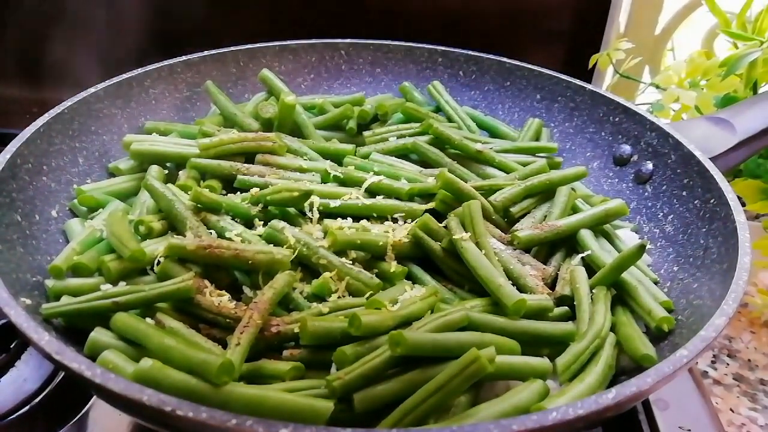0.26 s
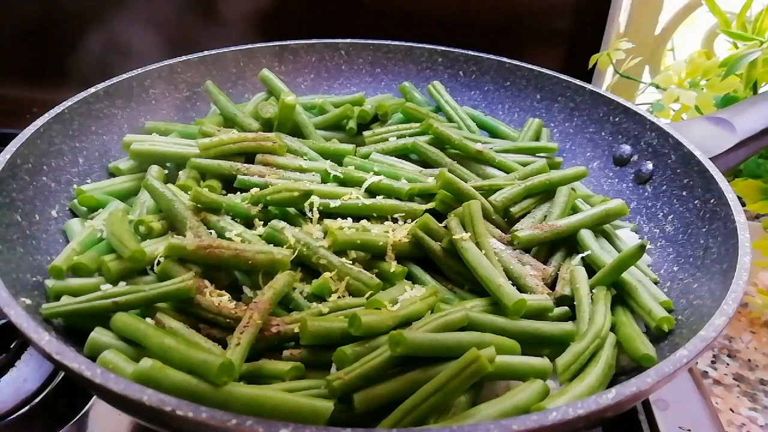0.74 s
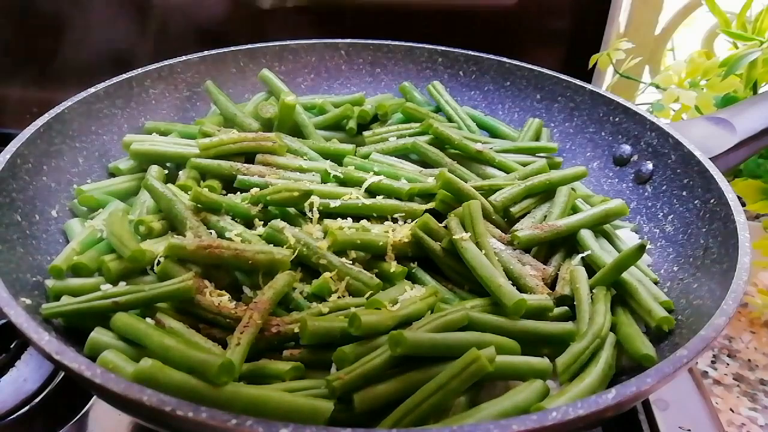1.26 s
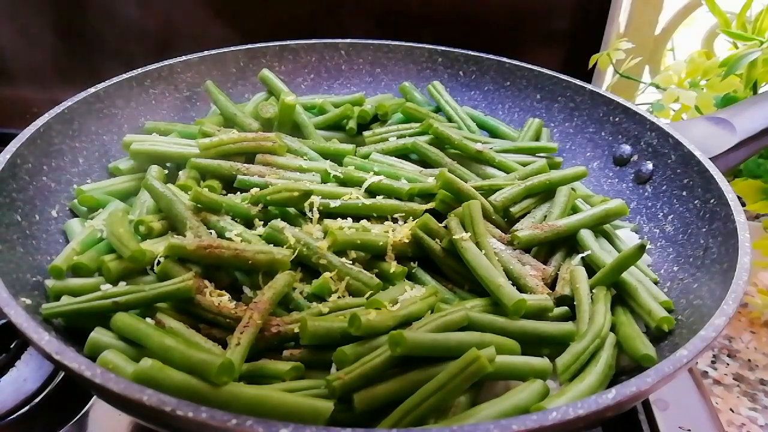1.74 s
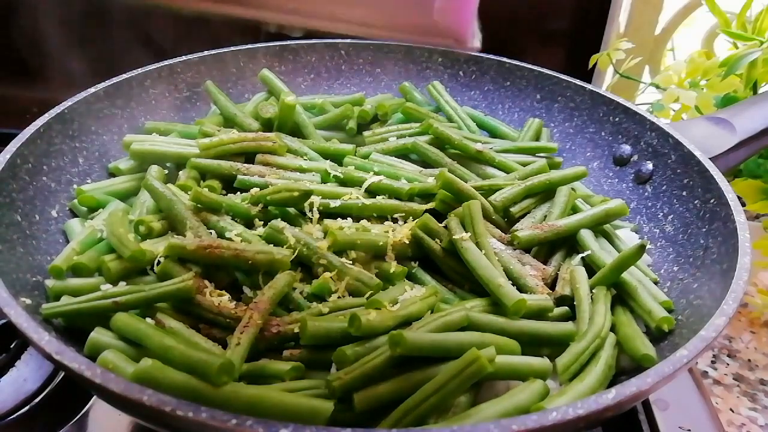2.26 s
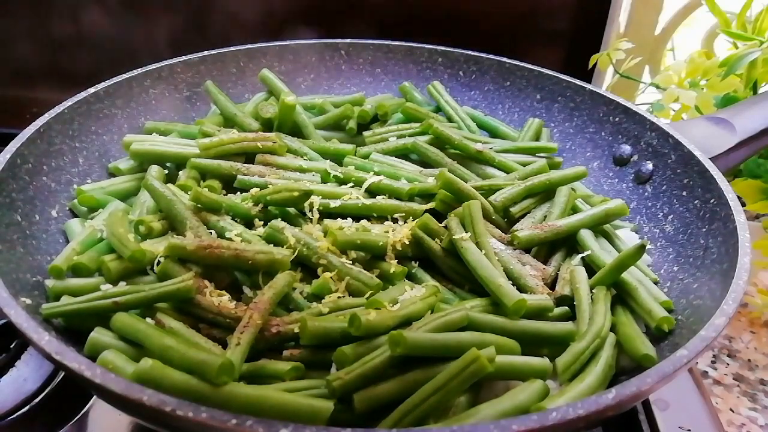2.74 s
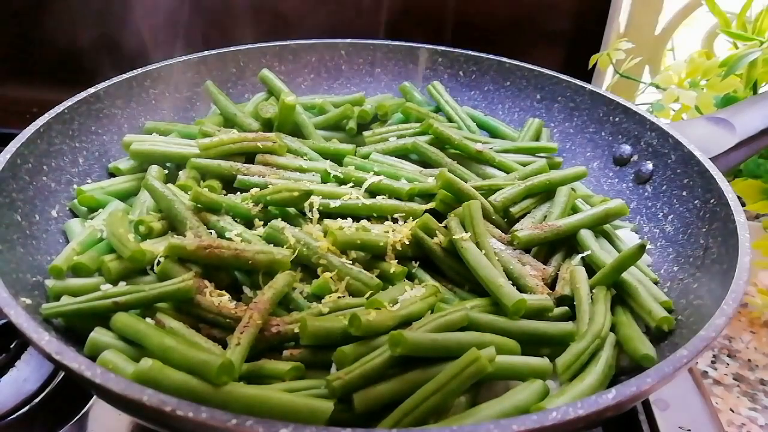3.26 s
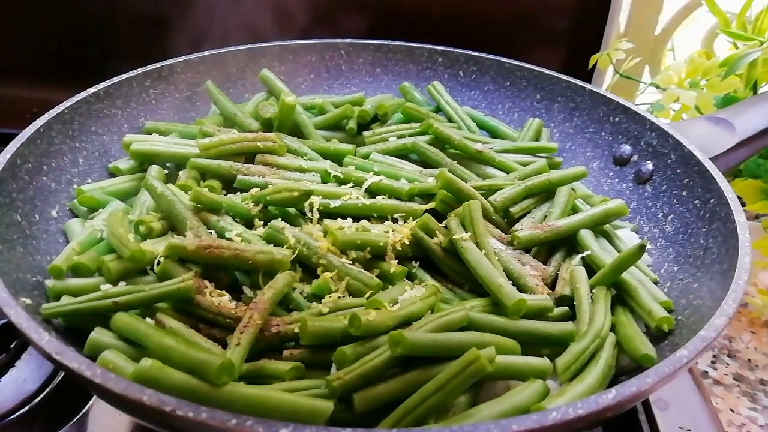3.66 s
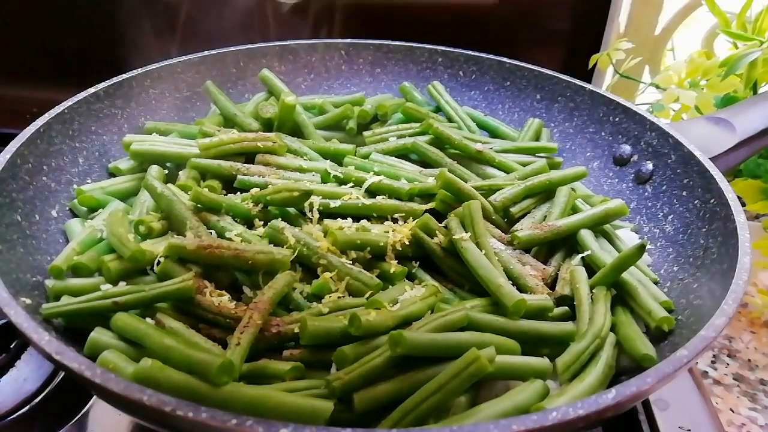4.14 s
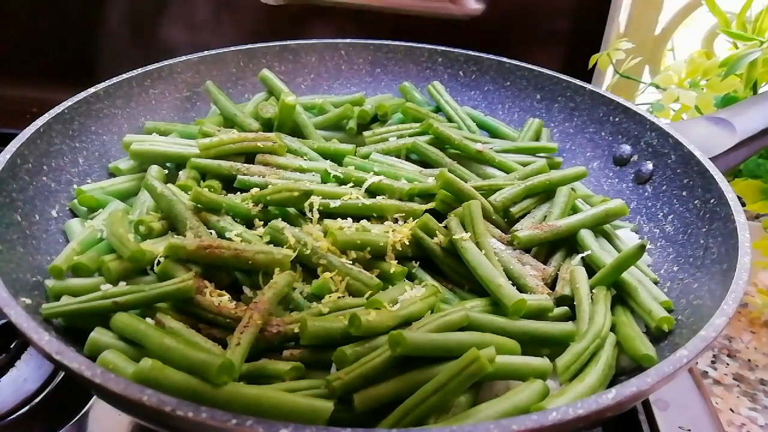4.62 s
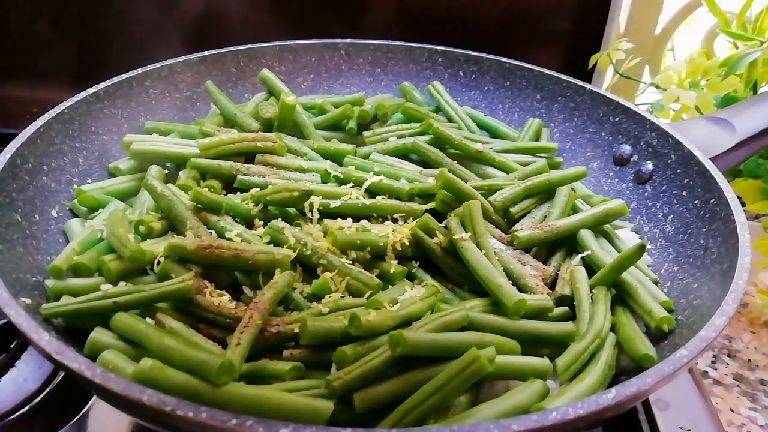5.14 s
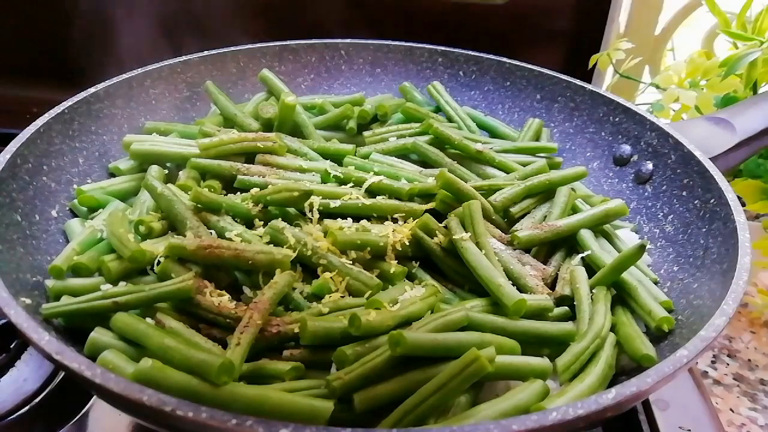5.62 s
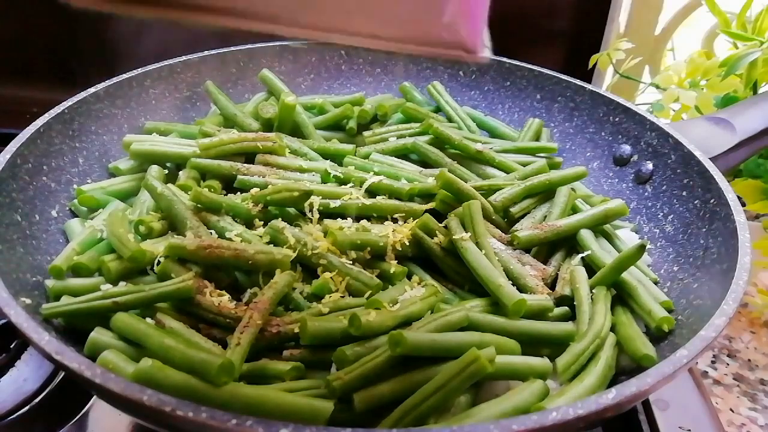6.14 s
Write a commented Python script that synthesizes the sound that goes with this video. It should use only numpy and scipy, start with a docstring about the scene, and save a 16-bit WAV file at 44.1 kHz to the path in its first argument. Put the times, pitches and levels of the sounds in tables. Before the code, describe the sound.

Beans sizzle softly in a pan above a murmuring flame while quick groups of dense, bright grater strokes tear lemon peel, with soft bumps between.

```python
"""A burner murmurs and a pan of green beans fries gently all through, as noise and random clicks.
Soft bumps come first, then a lemon is zested on a hand-held metal grater: two strokes, four, three and three.
Each stroke tears the peel in a dense crackle and rings the metal; brushes and bumps come in among them.
Early on the pan's hollow tone swells three times; from the middle on, a few sharper spits of fat jump out.
A small kitchen echoes faintly; the left microphone's port rings and the right microphone is shaded."""
import sys
import numpy as np
from scipy import signal
from scipy.fft import rfft, irfft, next_fast_len
from scipy.io import wavfile

SR = 44100
rng = np.random.default_rng(int(sys.argv[2]) if len(sys.argv) > 2 else 0)


def materialize(psi):
    """Save the field psi as 16-bit PCM at rate SR to the path in sys.argv[1].

    A 1-D psi becomes a single channel; in a 2-D psi each row is a channel.
    """
    bounded = np.clip(np.atleast_2d(psi).T, -1, 1)
    quanta = np.round(bounded * 32767).astype(np.int16)
    wavfile.write(sys.argv[1], SR, quanta)


N = 281779
TIME = np.arange(N) / SR   # seconds

# All levels in the tables are relative: the functions below scale them further.
# colour of the flame's murmur: pitch_hz, level_db (per Hz)
BURNER_SPECTRUM = [(20, -0.5), (65, 4), (130, 2), (280, 4), (450, -1), (680, -6), (1000, -1), (2000, -15.5),
                   (5000, -2), (12000, -24)]
# hollow tones, two of the pan and then one of the hob: pitch_hz, width_hz, level_db (rms)
HOLLOW_TONES = [(511, 20, -61), (549.3, 4.4, -65.5), (1115, 46, -82.5)]
# moments when the pan's hollow tone swells: middle_s, rise_db
PAN_SWELLS = [(.56, 0), (.865, 9.5), (1.7, 11), (2.1, 15)]
# colour of the frying: pitch_hz, level_db (per Hz)
SIZZLE_SPECTRUM = [(100, -11.5), (700, -5.5), (2000, -4.5), (3000, -4), (4000, -0.5), (6000, -0.5),
                   (8000, -1), (10500, -4), (11800, -16)]
# larger spits of fat in the pan: start_s, peak_db
FAT_SPITS = [(3.2038, -13.5), (4.8745, -26), (4.8833, -20), (5.1784, -27), (5.277, -18), (6.0437, -15)]
# soft bumps of fruit and fingers against the grater: middle_s, level_db
SOFT_BUMPS = [(0.132, -39.5), (0.496, -41), (.91, -47), (1.078, -38), (1.955, -33), (3.751, -44),
              (3.886, -36), (5.595, -33.5), (5.91, -35), (6.064, -35.5), (6.181, -36)]
# ringing modes of the metal grater:
# pitch_hz, width_hz, level_db, left_minus_right_db, growth_db_per_db (extra level per dB of push)
GRATER_MODES = [(407.3, 12, 0.5, -12.5, 0.1), (432, 32, 5.5, -2, -0.4), (511, 59, -4, 12, 0),
                (591, 43, -4.5, -3, 1), (744, 37, -7, -8, 1.1), (869, 93, 0, 3.5, 0.44),
                (1014, 45, -3.5, 13.5, 0.5), (1099, 55, -4, 11, 1.05), (1258, 21, -7, -15, 1.6),
                (1330, 49, 6.5, -7, 0.2), (1424, 86, -2, -6, -0.5), (1552, 41, 6, 5, 0.28),
                (1730, 17, -19, -1, -3), (2295, 156, -6, 8, 0.5)]
# the lemon brushes the grater: middle_s, body_level_db, half_length_s, scratch_db (relative to body)
LEMON_NUDGES = [(1.677, -53.5, .025, -13), (4.151, -52, 0.005, -10), (6.076, -39, 0.018, 1.5)]
# strokes of the lemon: start_s, length_s, attack_s, release_s, cutting_level_db, body_level_db
LEMON_STROKES = [(0.606, 0.16, 0.05, .1, -25.5, -36), (0.988, 0.13, 0.027, 0.062, -25, -35.5),
                 (1.907, 0.12, 0.042, 0.054, -24, -34.5), (2.276, 0.12, 0.017, 0.024, -23.5, -35.5),
                 (2.606, 0.12, 0.047, 0.042, -22.5, -34.5), (2.932, 0.12, 0.045, 0.029, -22.5, -31.5),
                 (3.86, 0.12, 0.025, 0.043, -28, -38.5), (4.266, 0.1, .018, 0.027, -23, -32.5),
                 (4.608, 0.096, .028, 0.05, -24, -33), (5.562, 0.093, 0.02, 0.036, -26, -35.5),
                 (5.856, 0.13, 0.054, 0.031, -27.5, -35.5), (6.134, 0.12, 0.038, 0.049, -25.5, -33.5)]
# the peel catches on a tooth and lets go: start_s, peak_db
PEEL_SNAGS = [(0.6544, -1.5), (0.6821, 0.5), (1.0594, -17), (2.3529, 3), (2.3872, -5), (2.6728, -4),
              (2.7008, 0), (4.584, -9), (4.6575, 1.5), (5.6171, -0.5), (5.8651, -7), (5.964, -6),
              (6.2367, -7.5)]
# colour of the tearing peel: pitch_hz, level_db (per Hz)
TEARING_SPECTRUM = [(25, -4), (70, -3), (140, -6.5), (300, -9.5), (700, -10.5), (2000, -8), (3000, -3.5),
                    (4200, -0.5), (6000, -2), (8000, 0), (10500, -5), (11800, -17.5)]
# rings of the cutting teeth: pitch_hz, width_hz, level_db (middle of its wander)
TEETH_RINGS = [(3690, 130, -9), (4400, 180, -9), (5090, 220, -6.5), (5980, 120, -3.5), (6500, 140, -15),
               (6880, 99, -12.5), (8330, 140, -16.5), (8880, 90, -9)]
# loss at the shaded right microphone: pitch_hz, gain_db
RIGHT_SHADE = [(30, -6), (70, -4), (150, -4.5), (400, -2), (1300, -3), (2200, -6), (3200, -9.5),
               (5000, -15.5), (7500, -14.5), (10500, -14)]

# level as a stroke begins and as it ends, relative to its middle
CUT_ENTRY_DB, CUT_EXIT_DB = -8.5, -11
BODY_ENTRY_DB, BODY_EXIT_DB = -9, -6.5
BODY_LAG_S = 0.0013   # the body follows the teeth a little later
# how steeply the level rises before a stroke and falls after it
CUT_LANDING_DB_PER_S, CUT_LIFT_DB_PER_S = 2200, 2000
BODY_LANDING_DB_PER_S, BODY_LIFT_DB_PER_S = 700, 1300
KITCHEN_T60_S = 0.28   # time for the echoes to fall by 60 dB
PORT_HZ, PORT_WIDTH_HZ, PORT_DB = 7634, 684, 11.5   # ring of the left microphone's port
CUTOFF_HZ = 11700   # top of the sound at both microphones


def from_db(db):
    """Decibels to gain."""
    return 10 ** (np.asarray(db) / 20)


def rms_one(x):
    """Scale to an rms of 1."""
    return x / np.sqrt(np.mean(x ** 2) + 1e-20)


def colour(x, spectrum):
    """Filter by a curve drawn through (Hz, dB) points, with nothing above a third of the sample rate."""
    size = next_fast_len(N + 4096)
    hz = np.maximum(np.fft.rfftfreq(size, 1 / SR), 1)
    points_hz, points_db = np.transpose(spectrum)
    curve_db = np.interp(np.log(hz), np.log(points_hz), points_db)
    gain = from_db(curve_db) * (hz < SR / 3)
    return irfft(rfft(x, size) * gain, size)[..., :N]


def resonate(x, hz, width_hz):
    """One resonance with a gain of 1 at its top; the narrower it is, the longer it rings."""
    r = np.exp(-np.pi * width_hz / SR)
    feed = np.array([1, 0, -1]) * (1 - r * r) / 2
    feedback = [1, -2 * r * np.cos(2 * np.pi * hz / SR), r * r]
    return signal.lfilter(feed, feedback, x + 1e-18)


def drift(per_s):
    """Random wander with a spread of 1, drawn as straight lines between per_s points a second."""
    knots = rng.standard_normal(N // 8)
    return rms_one(np.interp(TIME * per_s, np.arange(len(knots)), knots))


def grains(per_s, spread_db):
    """Random clicks of uneven size and either sign; rms 1."""
    sizes = from_db(spread_db * np.minimum(rng.exponential(1, N), 4))
    signs = rng.choice([-1, 1], N)
    happens = rng.random(N) < per_s / SR
    return rms_one(sizes * signs * happens)


def bursts(events, decay_s):
    """Each event is a short burst of noise that rises quickly and dies away."""
    envelope = np.zeros(N)
    for start_s, peak_db in events:
        age = np.clip((TIME - start_s) / decay_s, 0, 20)
        envelope += from_db(peak_db) * age * np.exp(1 - age)
    return envelope * rng.standard_normal(N)


def bell(middle_s, half_s):
    """A smooth rise and fall around one moment."""
    return np.exp(-.5 * ((TIME - middle_s) / half_s) ** 2)


def two_ports(draw, alike):
    """Stereo from three draws of a source: one shared, one for each side."""
    shared = np.sqrt(alike) * draw()
    sides = np.array([draw(), draw()])
    return shared + np.sqrt(1 - alike) * sides


def reflections(x, t60_s, delay_s):
    """Dense echoes that die away, different at each microphone; about as strong as their source."""
    age = TIME[:SR // 2]
    fade = from_db(-60 * age / t60_s) * (age > delay_s)
    echoes = rng.standard_normal((2, len(age))) * fade
    echoes /= np.sqrt(np.sum(echoes ** 2, axis=1, keepdims=True))
    return signal.fftconvolve(np.atleast_2d(x), echoes, axes=1)[:, :N]


def burner(flame_db=-50.5, waver_db=0.6, hollow_right_db=-4.5):
    """The flame's noise makes a soft murmur and sets off the hollow tones of pan and hob."""
    flame = two_ports(lambda: rng.standard_normal(N), alike=0.75)
    flame_gain = from_db(flame_db + waver_db * drift(per_s=6.2))
    murmur = flame_gain * rms_one(colour(flame, BURNER_SPECTRUM))
    tones = [from_db(db) * rms_one(resonate(flame, hz, width)) for hz, width, db in HOLLOW_TONES]
    *pan_tones, hob_tone = tones
    swell = from_db(sum(db * bell(s, half_s=0.028) for s, db in PAN_SWELLS))
    hollow = swell * sum(pan_tones) + hob_tone
    return murmur + hollow * from_db([[0], [hollow_right_db]])   # left, right


def frying(sizzle_db=-41.0, flutter_db=0.58, spit_db=-11.5):
    """Countless tiny steam bubbles burst under the beans as random clicks, with a few sharper spits."""
    bubbles = two_ports(lambda: grains(per_s=9000, spread_db=3.0), alike=0.051)
    fizz = rms_one(colour(bubbles, SIZZLE_SPECTRUM))
    flutter = from_db(sizzle_db + flutter_db * drift(per_s=60))
    spits = from_db(spit_db) * colour(bursts(FAT_SPITS, decay_s=0.00075), SIZZLE_SPECTRUM)
    return flutter * fizz + spits


def grater_body(push, usual_db=-39.5):
    """Many small tugs ring the metal sheet's modes, each with its own balance of left and right."""
    tugs = push * two_ports(lambda: grains(per_s=1800, spread_db=2.5), alike=0.89)
    push_db = 20 * np.log10(push + 1e-9)
    force_db = np.maximum(push_db - usual_db, -12)
    ringing, power = np.zeros((2, N)), 0
    for hz, width, db, left_minus_right_db, growth in GRATER_MODES:
        # pressing harder drives some modes more and others less
        drive = tugs * from_db(growth * force_db)
        sides_db = np.array([[left_minus_right_db], [-left_minus_right_db]]) / 2
        ringing += resonate(drive, hz, width) * from_db(db + sides_db)
        power += from_db(db) ** 2 * np.pi * width / SR
    return ringing / np.sqrt(power)


def handling(soft_hz=550, contact_s=0.0034, bump_db=5.0):
    """Soft knocks push the grater's body, and a low-pass keeps mostly its lowest modes."""
    push = sum(from_db(db) * bell(s, contact_s) for s, db in SOFT_BUMPS)
    low_pass = signal.butter(2, soft_hz, fs=SR, output="sos")
    return from_db(bump_db) * signal.sosfilt(low_pass, grater_body(push))


def stroke_shape(age, length, attack, release, entry_db, exit_db, landing_db_per_s, lift_db_per_s):
    """Level in dB over one stroke: the lemon lands, is pressed in, held, eased off and lifted."""
    pressing = entry_db * np.clip(1 - age / attack, 0, 1)
    easing = exit_db * np.clip(1 - (length - age) / release, 0, 1)
    before = landing_db_per_s * np.maximum(-age, 0)
    after = lift_db_per_s * np.maximum(age - length, 0)
    return pressing + easing - before - after


def stroke_gains():
    """How hard the teeth cut and how hard the body is shaken; each stroke drives both."""
    cutting, shaking = np.zeros(N), np.zeros(N)
    for start, length, attack, release, cut_db, body_db in LEMON_STROKES:
        near = np.abs(TIME - start) < .5
        age = TIME[near] - start
        cut_shape = stroke_shape(age, length, attack, release, CUT_ENTRY_DB, CUT_EXIT_DB,
                                 CUT_LANDING_DB_PER_S, CUT_LIFT_DB_PER_S)
        body_shape = stroke_shape(age - BODY_LAG_S, length, attack, release, BODY_ENTRY_DB, BODY_EXIT_DB,
                                  BODY_LANDING_DB_PER_S, BODY_LIFT_DB_PER_S)
        cutting[near] += from_db(cut_db + cut_shape)
        shaking[near] += from_db(body_db + body_shape)
    return cutting, shaking


def add_nudges(cutting, shaking):
    """A light brush of the lemon shakes the body and scratches the teeth."""
    for middle_s, db, half_s, scratch_db in LEMON_NUDGES:
        touch = from_db(db) * bell(middle_s, half_s)
        shaking = shaking + touch
        cutting = cutting + from_db(scratch_db) * touch
    return cutting, shaking


def teeth_ring(crackle, shift_db=15.0):
    """Different teeth ring as the lemon travels, so the rasp's colour keeps shifting."""
    rings = np.zeros((2, N))
    for hz, width, db in TEETH_RINGS:
        gain = from_db(db + shift_db * np.tanh(drift(per_s=32)))
        rings += gain * resonate(crackle, hz, width)
    return rms_one(crackle + rings)


def grating(tear_db=-0.6, snag_db=-16.5, body_db=-2.5, judder_db=3.5, body_judder_db=1.5, row_db=1.0):
    """Peel tears in tiny grains, in clumps as it sticks and slips over the teeth, and shakes the metal."""
    cutting, shaking = add_nudges(*stroke_gains())
    cutting = cutting * from_db(row_db * drift(per_s=120))   # rows of teeth bite unevenly
    slip = np.tanh(drift(per_s=330))   # towards -1 stuck, towards +1 tearing freely
    tears = two_ports(lambda: grains(per_s=12000, spread_db=1.84), alike=0.085)
    crackle = teeth_ring(colour(tears, TEARING_SPECTRUM))
    judder = rms_one(from_db(judder_db * slip))
    tearing = from_db(tear_db) * cutting * judder * crackle
    snags = from_db(snag_db) * colour(bursts(PEEL_SNAGS, decay_s=0.0016), TEARING_SPECTRUM)
    body_judder = rms_one(from_db(body_judder_db * slip))
    body = from_db(body_db) * grater_body(shaking * body_judder)
    return tearing + snags + body


def scene(room_db=-14.0):
    """Grater and pan near the microphones, with faint kitchen echoes of them, and the burner below."""
    near = frying() + handling() + grating()
    echoes = from_db(room_db) * reflections(near, t60_s=KITCHEN_T60_S, delay_s=0.01)
    return burner() + near + echoes


def record(dry):
    """The left port rings, the right one is shaded, and the top is cut."""
    left = dry[0] + from_db(PORT_DB) * resonate(dry[0], PORT_HZ, PORT_WIDTH_HZ)
    right = colour(dry[1], RIGHT_SHADE)
    low_pass = signal.ellip(12, .1, 90, CUTOFF_HZ, fs=SR, output="sos")   # ripple 0.1 dB, stop 90 dB
    return signal.sosfilt(low_pass, np.array([left, right]))


dry = scene()
out = record(dry)
materialize(out)
```